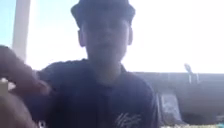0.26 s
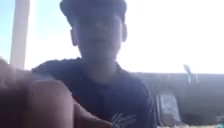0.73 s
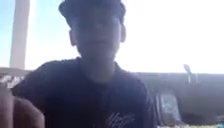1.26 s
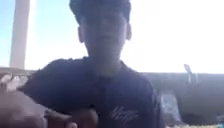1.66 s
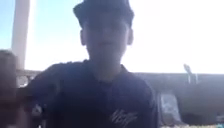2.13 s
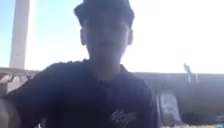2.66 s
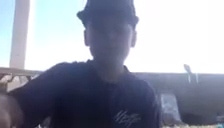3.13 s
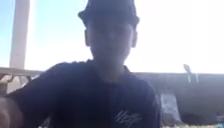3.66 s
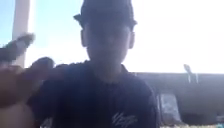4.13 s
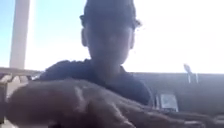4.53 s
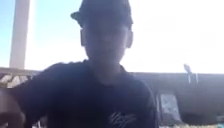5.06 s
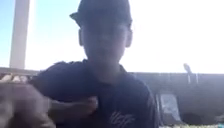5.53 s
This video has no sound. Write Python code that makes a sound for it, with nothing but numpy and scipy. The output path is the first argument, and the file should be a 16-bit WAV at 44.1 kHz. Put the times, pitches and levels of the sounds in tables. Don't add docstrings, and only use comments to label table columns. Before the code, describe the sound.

A miniature finger skateboard is handled on a hollow plastic cooler lid, close and dry, outdoors. From 0 to 0.2 s dry clacks tumble quickly, then light ticks. A hard double knock at 0.47 s starts a coarse, loud roll along the rim until about 0.8 s, with cracks near 0.67 s. Soft ticks follow to 1.25 s, a rattling landing at 1.3 s, and strong bright knocks at 1.4-1.5 s. Scrapes and a skid come around 1.75 s; a narrow, singing scrape leads into clustered clacks at 2.05-2.4 s. Smaller taps thin out, leaving near quiet from 3.3 to 3.8 s. A boomy landing hits at 3.94 s, a heavier slap at 4.08 s, then a roll from 4.4 to 4.85 s with a huge crack at 4.65 s. Knocks at 4.98 and 5.28 s precede a clipped, thumping landing at 5.4 s and fading scuffs. Faint low traffic and motor hum continue throughout.

```python
import sys
import numpy as np
from scipy import signal
from scipy.fft import rfft, irfft, next_fast_len
from scipy.io import wavfile
from scipy.ndimage import uniform_filter1d, map_coordinates

SR = 44100
rng = np.random.default_rng(int(sys.argv[2]) if len(sys.argv) > 2 else 0)


def magnitude_from_level(level_db):
    exponent = np.asarray(level_db, float) / 20
    return 10 ** exponent


def waveform_to_disk(signal):
    frames = np.transpose(np.atleast_2d(signal))
    scaled = np.clip(frames, -1, 1) * 32767
    samples = np.round(scaled).astype(np.int16)
    wavfile.write(sys.argv[1], SR, samples)


N = 255735


def unit(x):
    return x / np.sqrt(np.mean(x ** 2) + 1e-20)


def wobble(rate):
    knots = rng.standard_normal(int(N * rate / SR) + 4)
    return map_coordinates(knots, [np.arange(N) * rate / SR])


def add(out, rows, starts):
    for row, at in zip(rows, starts):
        out[int(at):][:len(row)] += row


# pitch_hz [Hz], level_db [dB per Hz]
TRAFFIC_TONE = [(26, -38.5), (50, 3.5), (81, 7.5), (110, 0), (181, -5), (402, -28), (680, -32.5),
                (1020, -26), (1120, -53.5), (4730, -49), (7460, -53.5), (9160, -65.5), (10500, -70),
                (13600, -96), (22000, -120)]
# time_s [s], level_db [dB]
TRAFFIC_LEVEL = [(0, -44), (0.161, -58.5), (.45, -45), (.73, -69), (.97, -47), (1.21, -45.5), (1.47, -41),
                 (1.84, -45), (3.29, -43.5), (4.409, -45.5), (5.272, -46.5), (5.6, -45), (5.8, -42)]


def traffic():
    tone_hz, tone_db = np.transpose(TRAFFIC_TONE)
    hz = np.fft.rfftfreq(N, 1 / SR)
    colour = magnitude_from_level(np.interp(np.log(hz + 1), np.log(tone_hz + 1), tone_db))
    noise = irfft(rfft(rng.standard_normal(N)) * colour, N)
    level_db = np.interp(np.arange(N) / SR, *np.transpose(TRAFFIC_LEVEL))
    return magnitude_from_level(level_db + 0.5 + 0.38 * wobble(13)) * unit(noise)


# multiple [times its base pitch], level_db [dB]
MOTOR_HUM = [(1, -56.5), (2, -54.5), (3, -61.5), (4, -61), (5, -61.5), (6, -63.5), (7, -68.5), (8, -75)]


def motor():
    motor_hz, motor_drift = 66.7, 0.004
    fan_hz, fan_db = 82.8, -53.5
    turns = np.cumsum(motor_hz * (1 + motor_drift * wobble(1.9))) / SR
    fan_turns = np.cumsum(fan_hz * (1 + 0.025 * wobble(5.5))) / SR
    out = magnitude_from_level(fan_db + 3.1 * wobble(11)) * np.sin(2 * np.pi * fan_turns)
    for multiple, level_db in MOTOR_HUM:
        phase = 2 * np.pi * round(multiple) * turns + 6 * rng.random()
        out += magnitude_from_level(level_db + 5.9 * wobble(13)) * np.sin(phase)
    return out


# start_s [s], peak_db [dB], pitch_hz [Hz], t60_s [s to fade 60 dB]
THUMPS = [(0.108, -38, 61.3, 0.16), (0.469, -22.5, 70.5, 0.071), (1.412, -23.5, 102, 0.11),
          (1.508, -22.5, 59.3, 0.23), (4.081, -28.5, 72.2, 0.17), (5.392, -9.5, 106, 0.042)]
# start_s [s], peak_db [dB], pitch_hz [Hz], t60_s [s]
BOOMS = [(0.05, -13, 230, 0.033), (0.466, -20, 336, 0.049), (.47, -21, 555, .04), (1.091, -33, 150, 0.043),
         (1.114, -37, 189, 0.15), (1.293, -15.5, 161, 0.08), (1.407, -15, 322, 0.058),
         (1.505, -19.5, 263, 0.063), (2.125, -10.5, 300, 0.035), (2.157, -19, 310, 0.073),
         (2.222, -27, 325, 0.064), (2.286, -23.5, 188, 0.15), (3.085, -21, 192, 0.031),
         (3.937, -8, 189, 0.068), (4.086, -19, 152.5, 0.16), (4.092, -13, 358, 0.08),
         (4.6527, -14.5, 420, .025), (4.976, -18, 189, 0.04), (5.286, -13, 192, 0.085),
         (5.402, -15, 294, 0.14)]


def thumps():
    start_s, peak_db, pitch_hz, t60_s = np.transpose(THUMPS + BOOMS)[:, :, None]
    t = np.arange(SR // 4) / SR
    soft_start = 1 - np.exp(-t / 0.002)
    swings = magnitude_from_level(peak_db + 4.5 - 60 * t / t60_s) * np.sin(2 * np.pi * pitch_hz * t) * soft_start
    out = np.zeros(N + SR)
    add(out, swings, start_s[:, 0] * SR)
    return out[:N]


def grit(shape, rate, spread_db):
    chance, side, size = rng.random((3,) + shape)
    return (chance < rate / SR) * np.sign(side - 0.5) * magnitude_from_level(-spread_db * np.log(size + 0.0016))


def ring(force, modes, scatter_db, detune, soft_hz, near_hz, near_db, extra_db):
    size = next_fast_len(force.shape[1] + 1500)
    f = np.fft.rfftfreq(size, 1 / SR)
    spot = rng.standard_normal((len(force), len(modes), 2))
    body = 0
    for k, (pitch_hz, width_hz, level_db) in enumerate(modes):
        centre_hz = pitch_hz * (1 + detune * spot[:, k, :1])
        if near_hz is not None:
            level_db = level_db + near_db * np.exp(-0.5 * (np.log(pitch_hz / near_hz) / 0.1) ** 2)
        gain = (-1) ** k * magnitude_from_level(level_db + extra_db[:, k, None] + scatter_db * spot[:, k, 1:])
        damping = 1j * f * width_hz
        body = body + gain * damping / (centre_hz ** 2 - f * f + damping)
    body = body / (1 + 1j * f / soft_hz) ** 2
    body /= np.linalg.norm(body, axis=1, keepdims=True)
    return irfft(rfft(force, size) * body, size)


# pitch_hz [Hz], width_hz [Hz], level_db [dB]
DRUM = [(174, 39, -1.5), (297.4, 53.3, -1.5), (414, 127, -6)]
# pitch_hz [Hz], width_hz [Hz], level_db [dB]
SHELL = [(494.4, 122, -0.5), (603, 455, -1.5), (867, 172, -3.5), (956, 110.5, 1.5), (1070, 390, -4.5),
         (1497, 200, -0.5), (1611, 74, -6), (2006, 390, -7.5), (1500, 2600, -12.5)]
# pitch_hz [Hz], width_hz [Hz], level_db [dB]
BOARD = [(2430, 1200, -8), (2600, 190, 2), (2767, 390, 0.5), (2875, 217, 4.5), (3415, 260, -6.5),
         (4458, 560, -2), (4703, 420, -2.5), (6830, 550, -4), (6924, 750, -4), (7900, 3470, -4.5),
         (8740, 1270, -7), (9180, 600, -8.5), (4530, 6700, -11)]
# time_s [s], tilt_db [dB per octave]
GRIP = [(0, 3), (.3, 0), (.62, 1), (.9, 1), (1.1, -7), (1.3, -2), (1.45, 4.5), (1.75, -4.5), (1.83, -3),
        (1.89, 15.5), (1.97, -2.5), (2.2, -0.5), (2.6, 0), (3.3, 2), (4.0, 2.5), (4.7, 2.5), (5.2, 3.5),
        (5.8, 0.5)]


def grip_db(time_s, modes):
    tilt_db = np.interp(time_s, *np.transpose(GRIP))
    octaves = np.log2(np.array(modes)[:, 0] / 4500)
    return octaves * tilt_db[:, None] * (modes is BOARD)


# peak_s [s], rise_s [s], fall_s [s], shell_db [dB], board_db [dB over shell]
RIM_STROKES = [(.16, 0.45, 0.051, -34.5, -5.5), (.38, 0.13, 0.39, -59.5, -2),
               (1.43, 0.032, 0.21, -39.5, -4.5), (1.53, 0.12, 0.056, -31, -5.5), (1.58, .08, 0.16, -62, 5),
               (1.69, 0.033, 0.013, -51, 3), (1.746, 0.035, 0.041, -28.5, -4.5),
               (1.83, 0.13, 0.047, -49, 6.5), (1.89, 0.023, 0.029, -34, 5), (1.93, 0.17, 0.14, -28.5, -28),
               (2.02, 0.14, 0.16, -29, -9.5), (2.116, 0.11, 0.11, -29, -13), (2.42, 0.024, 0.075, -38, -6),
               (4.12, 0.061, 0.031, -22, -9), (4.226, 0.04, 0.043, -31.5, -10.5),
               (4.295, 0.051, 0.085, -36, -14), (5.51, 0.034, 0.054, -31.5, -35.5),
               (5.59, 0.092, 0.015, -40.5, -9), (5.8, 0.062, .1, -42, -16)]
# peak_s [s], rise_s [s], fall_s [s], shell_db [dB], board_db [dB over shell]
MID_STROKES = [(.094, 0.045, 0.057, -32.5, -8), (.885, 0.027, 0.088, -39, -14.5),
               (1.31, 0.07, 0.052, -28.5, -8), (2.225, 0.089, 0.21, -31.5, -9.5),
               (2.295, 0.023, 0.068, -29, -7.5), (2.564, 0.056, 0.077, -36.5, -9.5),
               (2.76, 0.06, 0.058, -38.5, -13), (3.17, 0.058, 0.039, -48, -15.5),
               (3.27, 0.057, 0.17, -53.5, -12.5), (3.76, 0.037, 0.072, -61.5, -10.5),
               (3.925, 0.021, 0.026, -32.5, -23), (3.95, 0.095, 0.094, -45, -3.5),
               (4.13, 0.037, 0.19, -33, -9.5), (4.89, 0.03, 0.052, -35, -12.5), (4.95, 0.02, 0.16, -44, -9),
               (5.27, 0.079, 0.56, -45, -12), (5.43, 0.069, 0.19, -27, -11), (5.62, 0.076, 0.055, -56.5, 1),
               (5.78, 0.077, 0.11, -38, -19)]
# time_s [s], push_db [dB], place [0 rim to 1 middle]
ROLLS = [
    [(.49, -42.5, 0.078), (.52, -27, 0), (.566, -23, 0.23), (.6, -24.5, 0.055), (.64, -18, 0.4),
     (.708, -19, 1), (.76, -25.5, 0.34), (.81, -36, 0.39), (.88, -58, 0.85)],
    [(4.35, -51, 0.59), (4.41, -37.5, 1.36), (4.5, -24, 0.86), (4.564, -30, 1.03), (4.65, -22.5, 1.2),
     (4.7, -23.5, 0.95), (4.79, -25, 0.86), (4.874, -30.5, 1.14), (4.89, -48, 1.5)],
]


def pressure():
    rim_drum_db, mid_drum_db = -15, -1.5
    rest_db, rest_sway_db = (-67, -57, -78.5), -1
    edge_db, swell, die = 20, 1.6, 1.5
    t = np.arange(0, N, 64) / SR
    power = magnitude_from_level(np.array(rest_db)[:, None] + rest_sway_db * wobble(10)[::64]) ** 2
    for strokes, drum_db in [(RIM_STROKES, rim_drum_db), (MID_STROKES, mid_drum_db)]:
        for peak_s, rise_s, fall_s, shell_db, board_db in strokes:
            before = np.abs((peak_s - t) / rise_s) ** swell
            after = np.abs((t - peak_s) / fall_s) ** die
            away = np.where(t < peak_s, before, after)
            parts_db = np.array([[0], [drum_db], [board_db]])
            power = power + magnitude_from_level(shell_db - edge_db * away + parts_db) ** 2
    for roll in ROLLS:
        time_s, push_db, place = np.transpose(roll)
        push_db = np.interp(t, time_s, push_db, left=-120, right=-120)
        place = np.interp(t, time_s, place)
        drum_db = rim_drum_db + place * (mid_drum_db - rim_drum_db)
        board_db = -8 + 0.068 * (push_db + 25)
        power = power + magnitude_from_level(push_db + np.array([0 * t, drum_db, board_db])) ** 2
    return [np.interp(np.arange(N) / SR, t, np.sqrt(p)) for p in power]


# time_s [s], singing_db [dB]
SINGING = [(0, -1), (.85, 5), (1.7, 0.5), (1.9, 16), (2.08, 9), (2.3, 11), (2.8, 4.5), (4.1, 0), (4.6, 4),
           (5.8, 5.5)]


def rolling():
    clump = 0.48 * wobble(68) + 0.5 * wobble(160)
    starts = np.arange(0, N, 2048)
    patch = starts[:, None] + np.arange(4096)
    fade = np.sqrt(np.hanning(4096))
    sing_db = np.interp(starts / SR, *np.transpose(SINGING))[:, None]
    out = np.zeros(N)
    # (modes, kicks a second, contact Hz, sung Hz, share of the singing, kick spread dB, pitch drift)
    layers = [(SHELL, 6000, 2200, 1010, 1.05, 2.1, 0.04),
              (DRUM, 5000, 900, 320, 0.95, 1.2, 0.04),
              (BOARD, 14000, 30000, 2920, 0.6, 2.3, 0.015)]
    for (modes, rate, soft_hz, sung_hz, share, spread_db, drift), gain in zip(layers, pressure()):
        kicks = magnitude_from_level(clump + 0.9 * wobble(70)) * grit((N,), rate, spread_db)
        force = np.pad(kicks, (2048, 4096))
        rows = ring(force[patch] * fade, modes, scatter_db=1.6, detune=drift, soft_hz=soft_hz,
                    near_hz=sung_hz, near_db=share * sing_db, extra_db=grip_db(starts / SR, modes))
        stream = np.zeros(N + SR)
        add(stream, rows, starts)
        out += gain * unit(stream[2048:][:N])
    return out


# start_s [s], shell_db [peak dB], board_db [dB over shell], note_hz [shell note, Hz]
SNAPS = [(.0325, -12.5, -0.5, 700), (.052, -6, 0, 600), (.084, -13.5, -2.5, 1160), (.111, -14, -15, 910),
         (.1145, -11, 4, 680), (.165, -20, -18, 850), (.468, -3.5, -4.5, 722), (.517, -38, 1, 865),
         (1.3905, -25, 18, 1100), (1.394, -4, -21, 1540), (1.411, -1, -4.5, 755), (1.419, -6.5, -9, 1446),
         (1.4975, -3, -5, 1480), (2.102, -11, -7.5, 1170), (2.123, -13, 3.5, 960),
         (2.154, -10.5, 1.5, 1030), (2.197, -29, 16.5, 1010), (2.288, -15.5, -8.5, 980),
         (2.382, -20, -5, 1120), (3.084, -29, -9, 970), (3.089, -23, -8, 1000), (3.095, -27.5, -12, 870),
         (4.976, -18.5, 5.5, 956), (5.178, -26, -5, 1094), (5.493, -12.5, -12, 616)]
SKIDS = [(1.072, -31.5, -12.5, 1060), (1.119, -34.5, -3, 1606), (1.291, -12, 4.5, 1480),
         (1.461, -15, -1, 1214), (1.755, -15.5, -18, 1007), (2.305, -23.5, 0, 960), (2.414, -25, -6, 955),
         (2.553, -27.5, -27, 970), (2.755, -23, -16, 1137), (3.166, -39.5, -8, 898),
         (3.869, -27.5, -9.5, 920), (3.922, -16, -24, 850), (3.929, -11.5, -18, 902),
         (3.9385, -13, 5.5, 750), (5.259, -23.5, -13.5, 912), (5.271, -16, -2.5, 945),
         (5.287, -13, 1.5, 796), (5.318, -27.5, 7.5, 1040), (5.399, -6.5, -4.5, 1110),
         (5.412, -16.5, 5, 1340), (5.423, -15.5, 1, 1040), (5.438, -13.5, -2, 1110),
         (5.763, -22.5, -12, 970)]
FLATS = [(.008, -17.5, 3, 843), (.461, -20.5, 2, 750), (1.511, -13, -2.5, 1160), (1.736, -23, 2, 1490),
         (2.221, -22, -1, 1086), (4.073, -5.5, -1.5, 1042), (4.089, -6, 1, 1006), (4.108, -14, -19, 1600),
         (5.390, -8, -1.5, 1340)]
CRACKS = [(.1263, -4, -7, 1026), (.4697, -7.5, -3.5, 1188), (.6613, -6, -18, 915),
          (.6763, -11.5, -10, 1020), (.6895, -12, -10, 865), (1.2932, -14.5, -2.5, 1500),
          (1.5072, -14.5, 12.5, 1110), (1.8822, -15, -5, 980), (2.0462, -11.5, -9, 1130),
          (2.1257, -12, 2.5, 1014), (2.1293, -12, -9.5, 1030), (2.2197, -28, 6.5, 1030),
          (3.9403, -6, -1.5, 872), (4.0757, -7.5, -6, 1298), (4.6537, 1.5, -9, 684),
          (4.6973, -23, -8.5, 915), (4.7463, -23, 8.5, 975), (5.3862, -22, 3.5, 1120)]
MORE_SNAPS = [(.001, -17.5, -14, 900), (0.089, -18, -6, 1180), (.13, -17, -4.5, 1000), (.139, -21, 0.5, 1000),
              (.474, -20, 8, 1014), (0.703, -18, -1, 910), (1.277, -26, 6, 1410), (1.285, -12, -8, 1430),
              (1.303, -17.5, -12, 1450), (1.313, -20, 2, 1450), (1.322, -23, 4, 1500),
              (1.331, -19, -18, 1490), (1.471, -18, 3, 1272), (1.482, -22, -3, 1200), (1.519, -37, 15, 1000),
              (1.527, -25, 9, 1210), (1.73, -30, 3, 1410), (1.743, -20.5, 2.5, 1100), (1.944, -32, -9, 1020),
              (2.115, -28, -19, 1040), (2.163, -5.5, -11, 1090), (2.177, -22, -4, 1270),
              (2.229, -32, -7, 990), (2.246, -17.5, -6, 1100), (3.915, -36.5, 12, 1440), (4.08, -6, -4, 1000),
              (4.092, -7.5, -11, 1014), (4.097, -16, -1, 1440), (4.493, -21.5, -16, 990),
              (5.394, -0.5, -23, 1013), (5.405, -3.5, -13, 1080), (5.459, -34, -4, 900),
              (5.512, -23, -7, 1100)]
# start_s [s], shell_db [peak dB], board_db [dB over shell]
TICKS = [(.185, -26, -2), (.206, -45, 1), (0.217, -24, -14), (0.238, -37.5, -3.5), (.257, -41, -9),
         (0.444, -47, 4.5), (0.452, -31, 2.5), (0.884, -49, 11), (0.899, -35, 7.5), (0.903, -51, -9),
         (.927, -37, -9), (.945, -47, 3), (.962, -63, 0), (0.996, -40.5, 0), (1.015, -37.5, -7),
         (1.093, -39, 1.5), (1.129, -35, -1.5), (1.197, -50, -9), (1.245, -27, -4), (1.265, -38, 5),
         (1.819, -34.5, 9.5), (1.833, -23.5, -5), (2.525, -29, -11), (2.64, -34, -17), (2.733, -24.5, -22),
         (2.83, -31, -17), (2.895, -42.5, -3.5), (2.968, -43, -2.5), (3.069, -34, -6), (3.24, -44, -10),
         (3.283, -41, -18), (3.364, -37.5, -10), (3.501, -44, -7.5), (3.749, -45.5, -8.5), (3.975, -40, 8),
         (4.049, -52, 9), (4.063, -32, -6), (4.206, -29, -1), (4.228, -27, -12), (4.414, -50, -10),
         (4.486, -42, -15), (5.037, -28, 3), (5.069, -55.5, 11), (5.625, -40.5, 8), (5.736, -40, -3)]
# [rise into the blow, s]
CRACK = (-14.5, 0.0053, 0.00087)


def contacts():
    ticks = [(*row, 970) for row in TICKS]
    snap = (-9, 0.048, 0.0012)
    skid = (-7, 0.1, 0.0013)
    flat = (0.68, 0.095, 0.0014)
    tick = (-6, 0.073, 0.0022)
    kinds = [(SNAPS, snap), (SKIDS, skid), (FLATS, flat), (CRACKS, CRACK), (MORE_SNAPS, snap), (ticks, tick)]
    return [(*row, *kind) for rows, kind in kinds for row in rows]


def clacks():
    start_s, shell_db, board_db, note_hz, drum_db, t60_s, swell_s = np.transpose(contacts())[:, :, None]
    lead = 441
    t = np.arange(-lead, 4500) / SR
    out = np.zeros(N + SR)
    layers = [(DRUM, shell_db + drum_db - 0.3, 0.35, 2500, 0.9, 700, None, 2.7, 2.5),
              (SHELL, shell_db + 0.015, 0.55, 5000, 1.1, 3000, note_hz, 2.4, 3.1),
              (BOARD, shell_db + board_db + 0.019, 0.45, 14000, 0.62, 30000, None, 1.5, 1.6)]
    for modes, peak_db, rattle, rate, share, soft_hz, near_hz, blow, scatter_db in layers:
        settle_s = np.clip(share * t60_s, 0.008, 0.2)
        swell = np.exp(np.minimum(t, 0) / swell_s)
        fade = np.where(t < 0, swell, magnitude_from_level(-60 * t / settle_s))
        force = rattle * fade * grit(fade.shape, rate, spread_db=-1.5)
        force[:, lead] = blow
        sound = ring(force, modes, scatter_db=scatter_db, detune=0.04, soft_hz=soft_hz, near_hz=near_hz,
                     near_db=13.5, extra_db=grip_db(start_s[:, 0], modes))
        sound *= magnitude_from_level(peak_db) / np.abs(sound).max(axis=1, keepdims=True)
        add(out, sound, np.round(start_s[:, 0] * SR))
    return out[lead:][:N]


def scene():
    return (traffic() + motor() + thumps() + rolling() + clacks())[None]


def dropouts(x, share, depth_db):
    hz, _, z = signal.stft(x, SR, nperseg=1024)
    loud = np.sum(np.abs(z[0]) ** 2, axis=0)
    steady = loud < 3 * np.roll(loud, 2)
    chance = rng.standard_normal((z.shape[1] // 4 + 1, z.shape[2] // 2 + 1))
    chance = unit(uniform_filter1d(chance, size=10, axis=1))
    chance = np.kron(chance, np.ones((4, 2)))[:len(hz), :len(loud)]
    likely = np.exp(-0.5 * ((hz - 4300) / 2100) ** 2) * (hz > 600) * (hz < 6300)
    drop = chance + share * likely[:, None] > 3.2
    return signal.istft(z * magnitude_from_level(-depth_db * drop * steady), SR, nperseg=1024)[1][:, :N]


def band_limit(x):
    return signal.sosfilt(signal.butter(12, 10790, fs=SR, output="sos"), x)


def record(dry):
    top_hz = 9980
    hz = np.fft.rfftfreq(N, 1 / SR)
    cut_db = -55 * np.clip((hz - top_hz + 300) / 900, 0, 1.5) ** 2
    x = irfft(rfft(dry) * magnitude_from_level(cut_db), N)
    x = dropouts(x, share=2.75, depth_db=35)
    x = np.clip(x, -1, 1)
    return band_limit(x)


dry = scene()
out = record(dry)
waveform_to_disk(out)
```